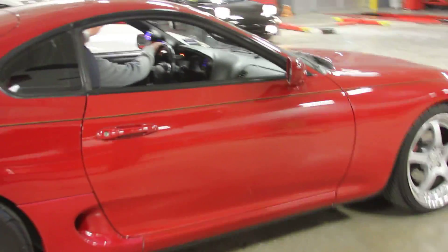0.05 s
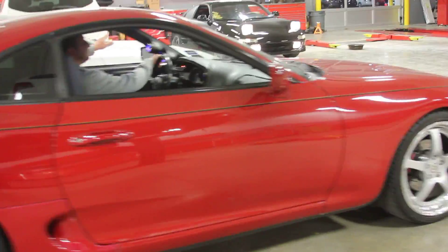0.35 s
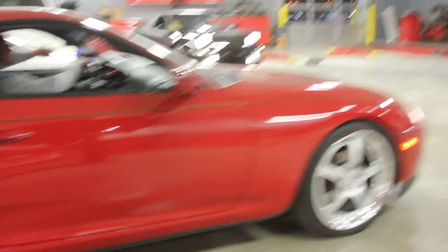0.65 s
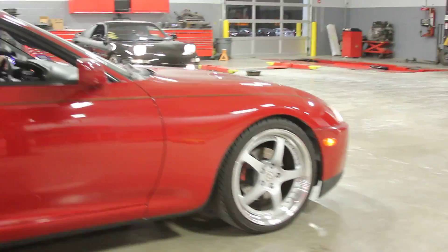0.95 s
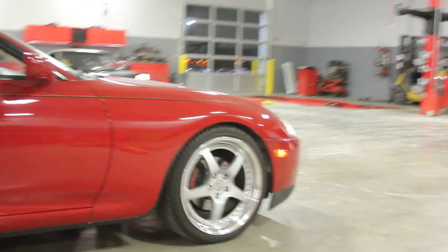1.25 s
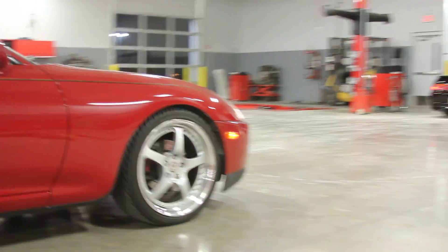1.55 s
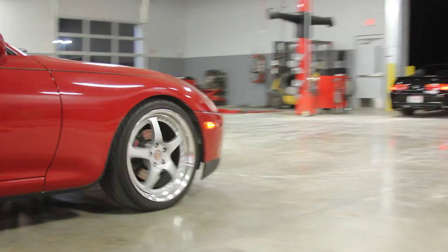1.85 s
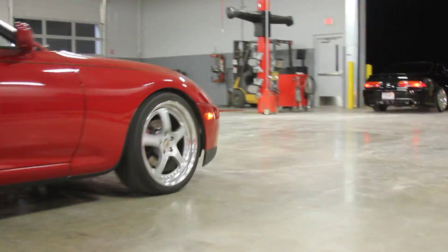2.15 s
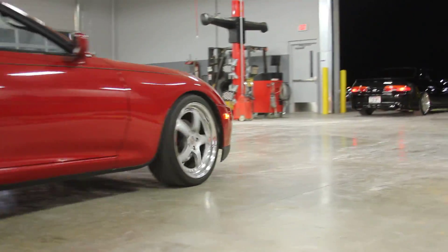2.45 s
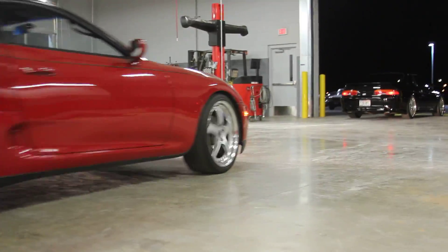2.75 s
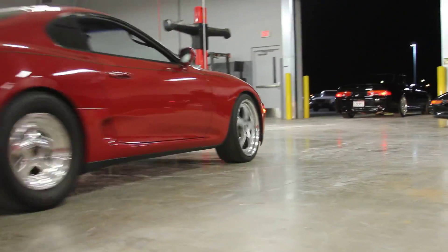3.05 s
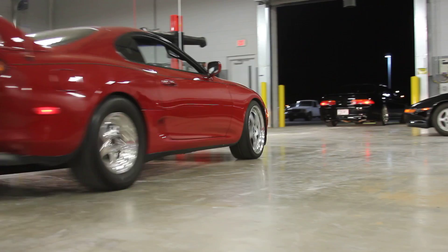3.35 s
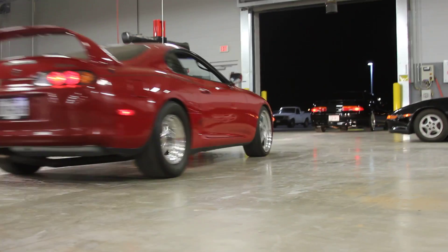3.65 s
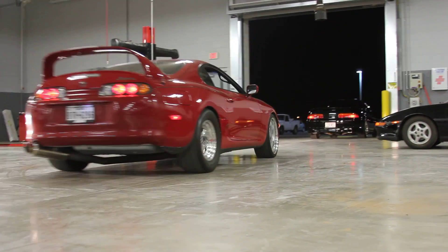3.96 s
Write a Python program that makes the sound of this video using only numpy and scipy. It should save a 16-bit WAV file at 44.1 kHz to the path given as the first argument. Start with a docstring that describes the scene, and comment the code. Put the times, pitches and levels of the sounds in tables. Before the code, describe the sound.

A sports car rumbles slowly through a garage, its tyres squeaking on the smooth floor.

```python
"""A six-cylinder sports car creeps through a concrete garage, revs rising and sinking.
Uneven firings and gas puffs make the exhaust hum, burble and rasp under a hissing, ringing engine bay.
A tyre sticks and slips on the smooth floor: squeals in the turn, then scuffs and chatter.
Another car idles across the hall. Exhaust noise and tyre carry the hall's diffuse tail."""
import sys
import numpy as np
from scipy import signal
from scipy.fft import rfft, irfft
from scipy.io import wavfile
from scipy.ndimage import uniform_filter1d, minimum_filter1d

SR = 44100
rng = np.random.default_rng(int(sys.argv[2]) if len(sys.argv) > 2 else 0)


def wrap_up_sound(samples):
    """Save the sound to the file named by the first command line argument, as 16-bit audio."""
    columns = np.atleast_2d(samples).T
    # keep every value between -1 and 1, then stretch to whole-number steps
    tamed = np.clip(columns, -1, 1)
    steps = np.round(tamed * 32767).astype(np.int16)
    wavfile.write(sys.argv[1], SR, steps)


N = 176400
T = np.arange(N) / SR

# (time [s], firing rate [Hz], relative level of harmonic 3 [dB])
REVS = [(0.0, 51.56, -31), (0.08, 56.63, -28), (0.17, 68.5, -14), (0.21, 72.53, -35), (0.33, 76.69, -26),
        (0.47, 75.83, -39), (0.6, 87.42, -27.5), (0.78, 91.14, -22), (0.99, 89.18, -18.5),
        (1.24, 108.5, -26.5), (1.5, 113.3, -28), (1.79, 108.5, -26.5), (2.02, 102, -28.5),
        (2.26, 105.9, -24), (2.64, 89.1, -20.5), (2.82, 83.32, -26), (3.25, 82.75, -24), (3.45, 77.02, -25),
        (3.61, 81.72, -20), (3.79, 79.84, -32), (3.95, 63.55, -29), (4.0, 61.1, -17)]
# relative engine levels (time [s], burble [dB], rasp [dB], hiss [dB])
LEVELS = [(0.0, -15.5, -27, -39.5), (0.13, -24, -33.5, -41.5), (0.26, -29.5, -37.5, -48),
          (0.53, -26.5, -36.5, -42), (0.68, -27, -37.5, -45.5), (0.73, -30, -37, -47.5),
          (0.79, -25, -37, -43.5), (1.17, -27.5, -34.5, -37.5), (1.71, -32.5, -39, -45),
          (1.95, -32.5, -35, -41), (2.1, -28.5, -32.5, -40), (2.76, -26.5, -35.5, -46),
          (2.81, -28.5, -37, -48.5), (3.6, -26.5, -38.5, -60), (3.7, -29, -34.5, -54), (4.0, -27, -34, -64)]


def exhaust_hum(firing_hz, cycles, shimmer=0.11, rough=0.46, lope=0.49, smear_rad=0.8):
    """Firing harmonics 1-3, plus rough overtones that lope once per crank turn."""
    # harmonic 1 (time [s], relative level [dB])
    bass = [(0.0, -23), (0.05, -29), (0.18, -25), (0.7, -13.5), (0.73, -21.5), (0.88, -11.5), (0.93, -22),
            (0.98, -14.5), (1.64, -10.5), (1.84, -19), (1.9, -25), (1.98, -18), (2.17, -12.5),
            (2.28, -23.5), (2.39, -12), (2.45, -19.5), (3.32, -23.5), (3.35, -29), (3.69, -21), (3.72, -31),
            (3.81, -24), (4.0, -29)]
    # harmonic 2 (time [s], relative level [dB])
    drone = [(0.0, -14.5), (0.26, -10), (0.31, -21), (0.37, -12), (0.41, -33), (0.44, -18), (0.7, -18),
             (0.72, -24), (0.85, -15), (0.92, -24), (0.97, -10.5), (1.06, -32), (1.15, -21), (1.24, -13),
             (1.39, -21.5), (1.73, -23), (1.83, -13.5), (1.87, -22.5), (1.93, -11.5), (2.02, -19.5),
             (2.17, -14.5), (2.46, -19), (2.48, -15), (2.8, -11.5), (2.86, -22.5), (2.9, -12), (3.33, -14),
             (3.39, -25.5), (3.43, -14.5), (3.5, -21.5), (3.53, -12), (3.68, -20.5), (3.7, -25),
             (3.78, -9.5), (3.82, -19), (4.0, -22.5)]
    # (harmonic, level re burble [dB], growl slope [dB/dB])
    overtones = [(4,-7.5,.5),(5,-8.5,1.32),(6,-20.5,0.5),(7,-22,1.1)]
    # overtone lift under throttle (time [s], gain [dB])
    growl = [(0,-6),(.35,7),(.6,-6),(1.05,-3.5),(1.35,-7.5),(1.9,-1),(2.1,3.5),(2.55,1.5),(2.85,-6.5),(3.6,0.5),(4,-12)]
    # pipe resonances (centre [Hz], half-width [Hz], peak [dB])
    pipes = [(345,71,2.5),(510,15,2.5)]
    out = np.zeros(N)
    for k, db in enumerate([curve(bass)[0] - 1, curve(drone)[0] - 0.5, curve(REVS)[1] - 1.5], 1):
        out += amp(db) * (1 + shimmer * drift(29)) * np.cos(2 * np.pi * (k * cycles + rng.random()))
    burble_db, growl_db = curve(LEVELS)[0], curve(growl)[0]
    crank_turns = cycles / 3
    for k, db, slope in overtones:
        pipe_db = sum(peak / (1 + ((k * firing_hz - hz) / width) ** 2) for hz, width, peak in pipes)
        gain = amp(burble_db + slope * growl_db + db + pipe_db) * (1 + rough * drift(26.7))
        gain *= 1 + lope * np.cos(2 * np.pi * (crank_turns + rng.random()))
        out += gain * np.cos(2 * np.pi * k * cycles + smear_rad * drift(22))
    return np.sqrt(2) * out


def firings(cycles, cylinder_spread=0.45, burn_spread=0.4):
    """One pulse per firing; the six cylinders differ, and so does each burn."""
    at = np.flatnonzero(np.diff(np.floor(cycles)))
    cylinders = rng.standard_normal(6)
    imbalance = np.resize(unit(cylinders - cylinders.mean()), len(at))
    pulses = np.zeros(N)
    pulses[at] = cylinder_spread * imbalance + burn_spread * rng.standard_normal(len(at))
    return unit(pulses)


def puffs(cycles, steady, decay_cycles=0.28):
    """Turbulence bursting out with each firing, over a steady share."""
    return unit((steady + np.exp(-(cycles % 1) / decay_cycles)) * rng.standard_normal(N))


def exhaust_noise(cycles, room_db=0.5):
    """Rumble and burble from firings and puffs, rasp from puffs and the hall tail of firings and puffs; all
    with hall tail."""
    # rumble of uneven firing, strongest at low revs (time [s], relative level [dB])
    uneven = [(0,-6.5),(.17,-21),(.3,-19),(.9,-25.5),(1.5,-28),(2.1,-28.5),(2.5,-24.5),(2.85,-26.5),(3.25,-30.5),(3.45,-23.5),(3.7,-25.5),(3.85,-26),(4,-18.5)]
    # spectra (frequency [Hz], relative density [dB])
    rumble_spectrum = [(20,-50),(45,-19),(65,-2.5),(100,4),(140,4.5),(215,8.5),(270,-5),(350,-14),(600,-50)]
    burble_spectrum = [(50,-55),(100,-32.5),(220,-2.5),(320,1.5),(400,-2),(480,-9),(600,-14),(900,-21.5),(2000,-60)]
    rasp_spectrum = [(80,-46),(300,-70),(600,2),(820,-0.5),(1050,-3.5),(1800,-7.5),(2600,-12),(3400,-13),(6000,-21.5),(10000,-32.5),(16000,-53)]
    burble_db, rasp_db, _ = curve(LEVELS)
    low = firings(cycles) + 0.5 * puffs(cycles, steady=0.32)
    mid = firings(cycles) + 0.87 * puffs(cycles, steady=0.33)
    rumble = colour(low + amp(room_db) * garage(low), rumble_spectrum)
    burble = colour(mid + amp(room_db) * garage(mid), burble_spectrum)
    rasp = colour(puffs(cycles, steady=2.4) + 0.66 * unit(garage(mid)), rasp_spectrum)
    return amp(curve(uneven)[0] + 1.5) * rumble + amp(burble_db + 2) * burble + amp(rasp_db - 0.5) * rasp


def exhaust_splutter():
    """Two splutters as the throttle lifts."""
    # (start [s], length [s], from [Hz], to [Hz], width [Hz], level [dB])
    splutters = [(2.415,0.056,417,378,180,-24.5),(2.485,.075,572,560,260,-30)]
    return bursts(splutters)


def boom(hz=165):
    """Low tone lingering as the revs sink."""
    # (time [s], level [dB])
    swell = [(3.7,-60),(3.79,-25),(3.9,-16),(4,-16)]
    return np.sqrt(2) * amp(curve(swell)[0]) * np.sin(2 * np.pi * hz * T)


def bay_hiss(cycles, flutter_db=0.8):
    """Engine-bay turbulence, pulsing faintly with the firings."""
    # (frequency [Hz], relative density [dB])
    spectrum = [(200,-35),(800,-8),(2500,4.5),(3400,3.5),(4600,1.5),(5600,0.5),(8000,1.5),(11000,1.5),(14000,-0.5),(16000,-5)]
    level_db = curve(LEVELS)[2] + 1.5 + flutter_db * drift(22)
    return amp(level_db) * colour(puffs(cycles, steady=5.7), spectrum)


def bay_rings(flicker_db=3.0):
    """Flickering metallic resonances that follow the hiss level."""
    # (centre [Hz], width [Hz], relative level [dB])
    modes = [(3287,170,-15),(4560,232,-12.5),(5640,120,-19),(6530,410,-18.5)]
    rings = sum(amp(db + flicker_db * drift(7.3)) * band(hz, width) for hz, width, db in modes)
    return amp(curve(LEVELS)[2]) * rings


def whine(end_s=0.22, fade_s=0.07):
    """Rough whine as the engine pulls up from idle."""
    # (centre [Hz], width [Hz], level [dB])
    bands = [(787,115,-35.5),(1936,970,-42.5)]
    fade = np.clip((end_s - T) / fade_s, 0, 1)
    return fade * sum(amp(db) * band(hz, width) for hz, width, db in bands)


def tyre_squeal(attack_s=0.007, trim_db=-2.5, octave_db=-27.5):
    """Tread blocks let go suddenly and slip in short gliding, scraping whistles."""
    # stick-slip chirps (start [s], length [s], from [Hz], to [Hz], relative level [dB])
    chirps = [(2.211,.045,4100,4280,-39),(2.317,0.044,4220,4460,-31),(2.334,0.074,4930,4690,-38.5),(2.398,0.056,4900,4190,-31),
              (2.512,0.053,4280,4500,-33.5),(2.55,0.058,5000,4830,-34),(2.567,0.052,4200,4350,-32.5),(2.62,0.042,4550,4040,-33.5),
              (2.65,0.08,4580,5100,-34),(2.673,0.056,4180,4150,-32.5),(2.727,0.042,4230,4380,-30),(2.755,0.04,4090,4110,-32.5),(2.768,.014,4100,4270,-29),(2.794,0.033,4330,4450,-34),(2.823,0.038,4400,4500,-30.5),
              (2.861,0.019,4800,4340,-28.5),(2.879,0.025,4360,4180,-32),(2.908,0.037,4720,4310,-26.5),(2.985,0.037,4300,4080,-35),(3.098,0.014,3840,3860,-36),(3.013,0.036,4850,5240,-32.5),
              (3.029,0.02,4450,4400,-33),(3.044,0.02,4230,4130,-30),(3.067,0.037,4900,4900,-33.5),(3.07,0.017,4520,4140,-28),(3.103,0.04,4800,5250,-36.5),
              (3.108,0.033,4480,4000,-34.5),(3.145,0.023,4540,4660,-24),(3.164,0.021,5030,5340,-31.5)]
    out = np.zeros(N)
    waver = 1 + 0.012 * drift(109)
    scrape = 1 + 0.38 * drift(380)
    for start_s, length_s, from_hz, to_hz, db in chirps:
        u = np.linspace(0, 1, round(length_s * SR))
        envelope = np.minimum(u * length_s / attack_s, 1) * np.sqrt(1 - u ** 2)
        hz = (from_hz + (to_hz - from_hz) * u) * waver[round(start_s * SR):][:len(u)]
        phase = 2 * np.pi * np.cumsum(hz) / SR
        whistle = np.sin(phase) + amp(octave_db) * np.sin(2 * phase)
        add(out, start_s, np.sqrt(2) * amp(db + trim_db) * envelope * whistle)
    return out * scrape


def tyre_scuffs():
    """Rubber scuffing roughly over the floor."""
    # (start [s], length [s], from [Hz], to [Hz], width [Hz], level [dB])
    scuffs = [(3.416,0.041,4450,3600,600,-43.5),(3.484,0.033,2900,2800,3000,-36),(3.494,.024,6000,6000,9000,-46),(3.43,.075,6800,7000,4500,-53),(3.624,.062,5800,5450,550,-47.5)]
    return bursts(scuffs)


def tyre_chatter(start_s=3.652, rise_s=0.0084, slips_per_s=29, pitch_hz=3670, bend=0.04, level_db=-41.5):
    """Rubber catches and lets go unevenly; the squeak rises through each slip."""
    # partials 2 and 3 (width [Hz], level re fundamental [dB])
    partials = [(800,-17),(800,-24)]
    slips = np.cumsum(slips_per_s * (1 + 0.25 * drift(9.3)) * (T > start_s)) / SR
    hz = pitch_hz * (1 + bend * (slips % 1 - 0.5) + 0.026 * drift(300) + 0.0103 * drift(13.4))
    squeak = np.sqrt(2) * np.sin(2 * np.pi * np.cumsum(hz) / SR)
    onset = np.clip((T - start_s) / rise_s, 0, 1)
    envelope = onset * np.abs(np.sin(np.pi * slips)) ** 1.3 * (1 + 0.5 * drift(120))
    fuzz = sum(amp(db) * band(k * pitch_hz, width) for k, (width, db) in enumerate(partials, 2))
    return amp(level_db) * envelope * (squeak + fuzz)


def idling_car():
    """Steady two-harmonic drone from across the hall."""
    # (frequency [Hz], level [dB])
    tones = [(37.5,-56),(75,-37)]
    sway_rad = 0.2 * drift(0.97)
    return np.sqrt(2) * sum(amp(db) * np.sin(2 * np.pi * hz * T + k * sway_rad)
                            for k, (hz, db) in enumerate(tones, 1))


def garage(x):
    """Diffuse hall tail of x, shorter in the treble."""
    # (frequency [Hz], T60 [s])
    decay = [(100,0.9),(1000,1.12),(5000,0.63),(15000,0.29)]
    hz, t, noise = signal.stft(rng.standard_normal(SR), SR, nperseg=256)
    tail = signal.istft(noise * amp(-60 * t / log_interp(decay, hz)[:, None]), SR, nperseg=256)[1]
    return signal.fftconvolve(x, tail / np.linalg.norm(tail))[:N]


def bursts(table):
    """Rounded swells of gliding narrow-band noise."""
    out = np.zeros(N)
    for start_s, length_s, from_hz, to_hz, width_hz, db in table:
        u = np.linspace(0, 1, round(length_s * SR))
        envelope = np.abs(np.sin(np.pi * u)) ** 0.44
        grain = (drift(width_hz / 2) + 1j * drift(width_hz / 2))[:len(u)]
        carrier = np.exp(2j * np.pi * np.cumsum(from_hz + (to_hz - from_hz) * u) / SR)
        add(out, start_s, amp(db) * envelope * (grain * carrier).real)
    return out


def band(hz, width_hz):
    """Noise in a narrow resonance, rms 1."""
    return ((drift(width_hz / 2) + 1j * drift(width_hz / 2)) * np.exp(2j * np.pi * hz * T)).real


def drift(rate_hz):
    """Noise low-passed at rate_hz, rms 1."""
    count = N // 8
    hz = np.fft.rfftfreq(count, N / count / SR)
    slow = irfft(rfft(rng.standard_normal(count)) / (1 + (hz / rate_hz) ** 4), count)
    return unit(np.interp(T, np.linspace(0, T[-1], count), slow))


def colour(x, spectrum):
    """x filtered by a spectrum, rms 1."""
    return unit(irfft(rfft(x) * amp(log_interp(spectrum, np.fft.rfftfreq(N, 1 / SR))), N))


def log_interp(table, hz):
    """Table value on a log-frequency axis."""
    knots_hz, values = np.transpose(table)
    return np.interp(np.log(hz + 1), np.log(knots_hz), values)


def curve(table):
    """Value columns of a time table, per sample."""
    times_s, *columns = np.transpose(table)
    return [np.interp(T, times_s, column) for column in columns]


def amp(db):
    """dB to gain."""
    return 10 ** (np.asarray(db) / 20)


def unit(x):
    """x at rms 1."""
    return x / np.sqrt(np.mean(x ** 2) + 1e-20)


def add(mix, start_s, sound):
    """Mix sound in at start_s."""
    part = mix[round(start_s * SR):][:len(sound)]
    part += sound[:len(part)]


def scene(tyre_room_db=-11.5):
    """Sports car, tyre and idling car; mono."""
    firing_hz = curve(REVS)[0]
    cycles = np.cumsum(firing_hz) / SR
    tyre = tyre_squeal() + tyre_scuffs() + tyre_chatter()
    car = exhaust_noise(cycles) + bay_hiss(cycles) + exhaust_hum(firing_hz, cycles)
    car += exhaust_splutter() + bay_rings() + whine() + boom()
    return (car + idling_car() + tyre + amp(tyre_room_db) * garage(tyre))[None]


def record(dry, ceiling=0.8, limiter_s=0.012, cutoff_hz=15750):
    """Peak limiter, then low-pass."""
    size = round(limiter_s * SR)
    needed_gain = ceiling / np.maximum(abs(dry), ceiling)
    gain = uniform_filter1d(minimum_filter1d(needed_gain, size), size)
    lowpass = signal.firwin(511, cutoff_hz, window=("kaiser", 9), fs=SR)
    return signal.oaconvolve(dry * gain, lowpass[None], "same")


dry = scene()
out = record(dry)
wrap_up_sound(out)
```